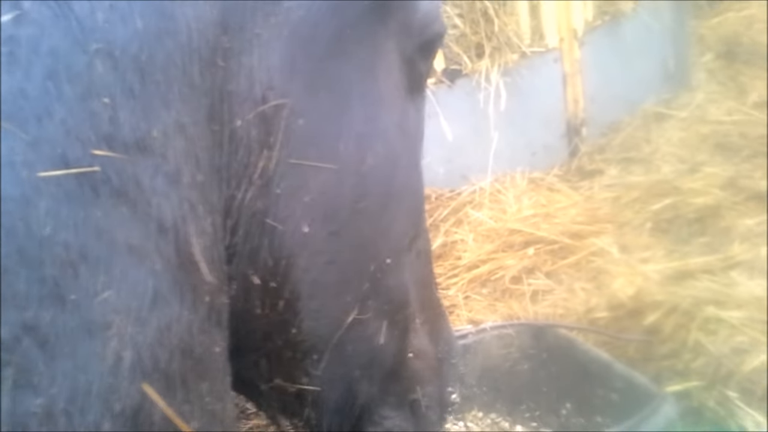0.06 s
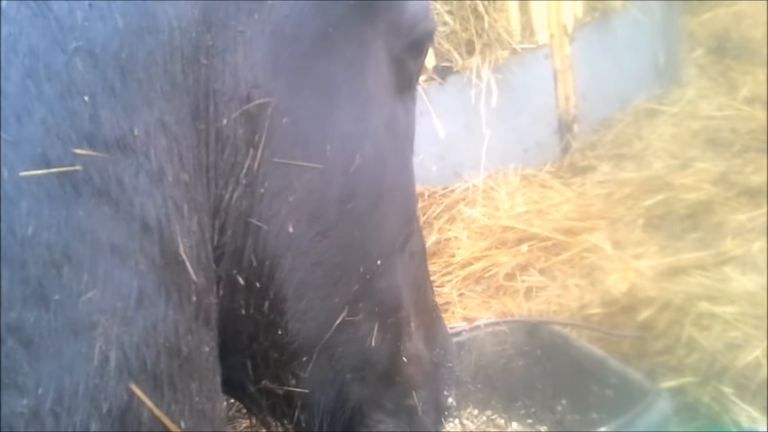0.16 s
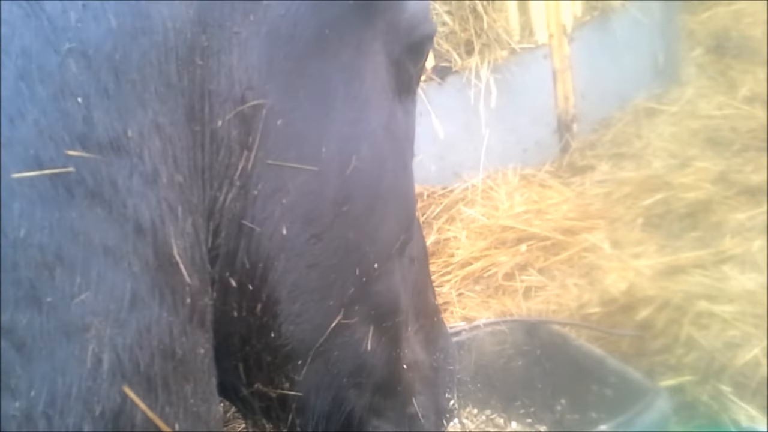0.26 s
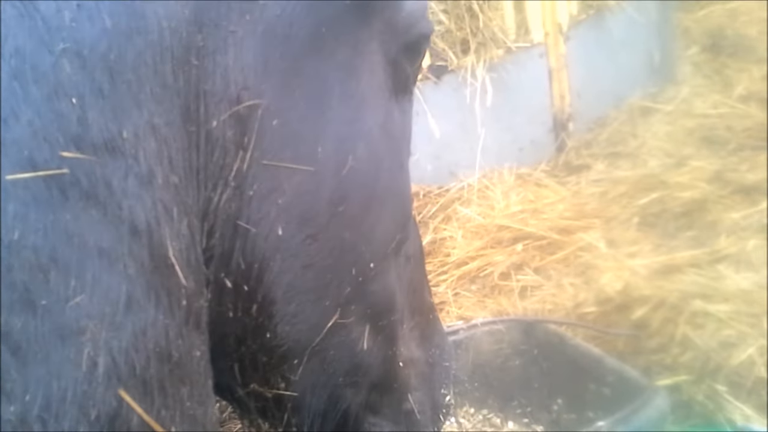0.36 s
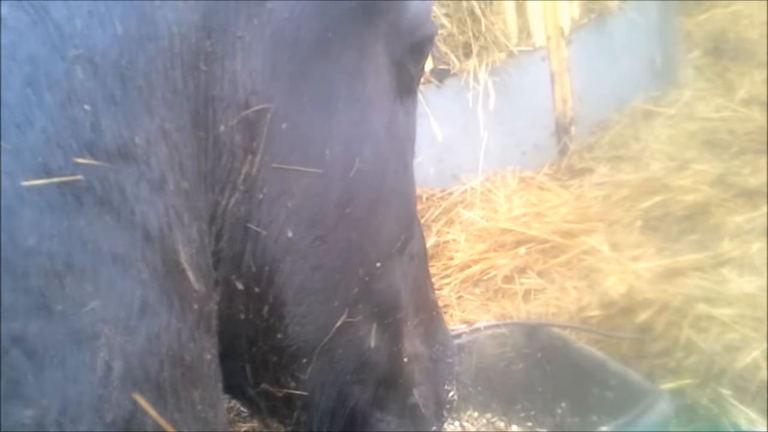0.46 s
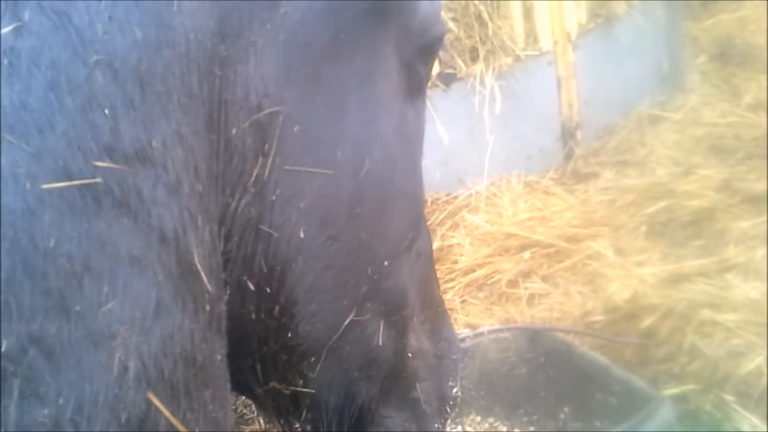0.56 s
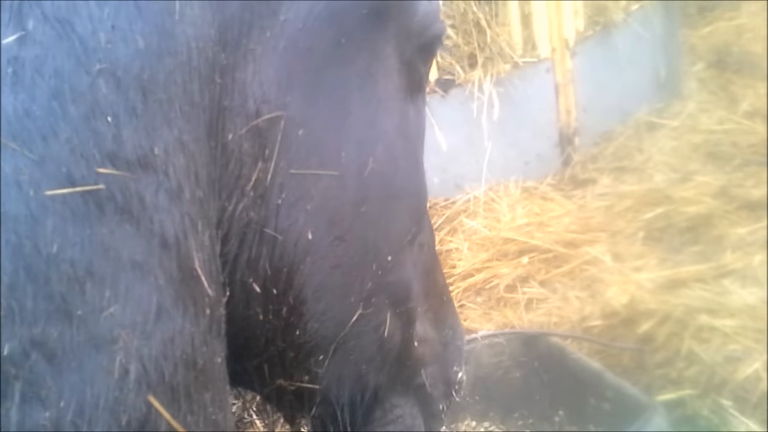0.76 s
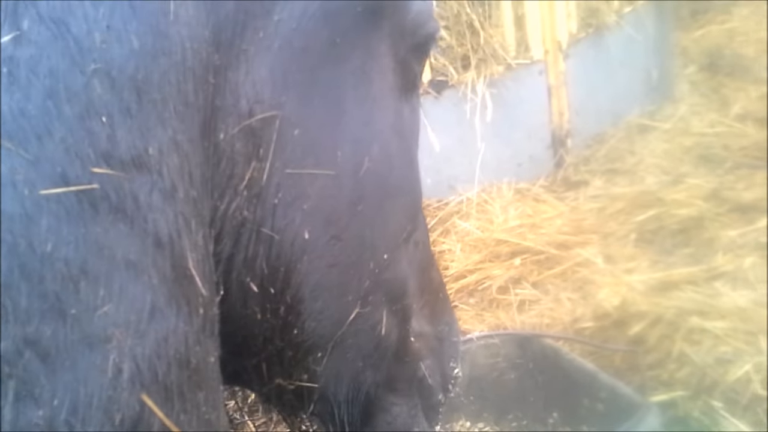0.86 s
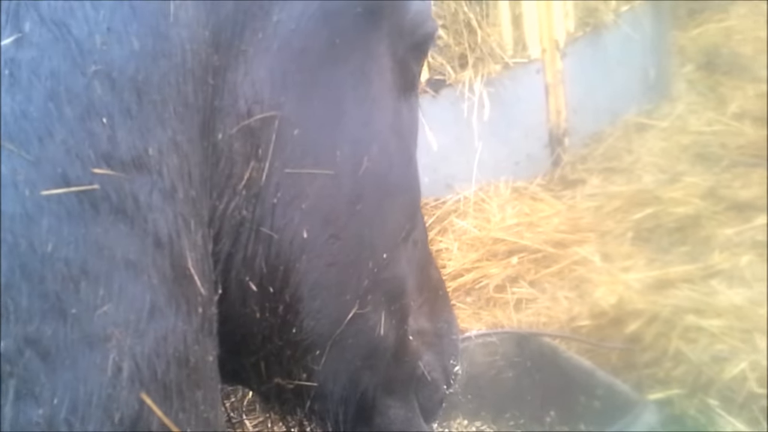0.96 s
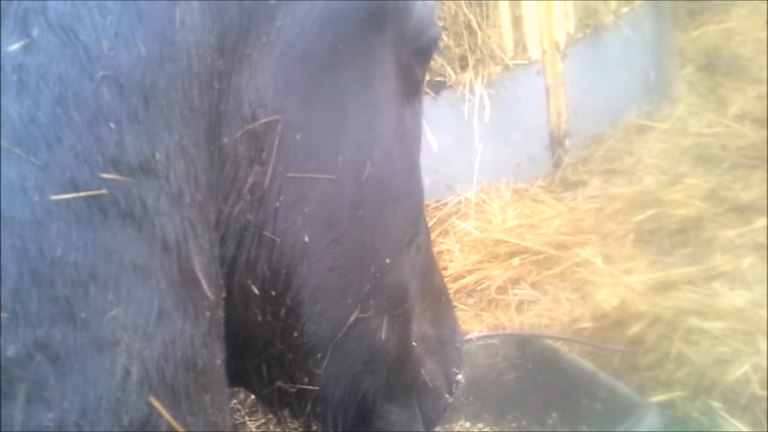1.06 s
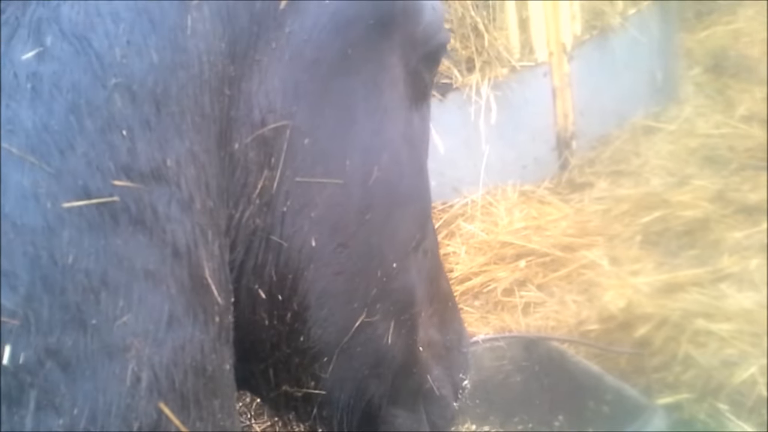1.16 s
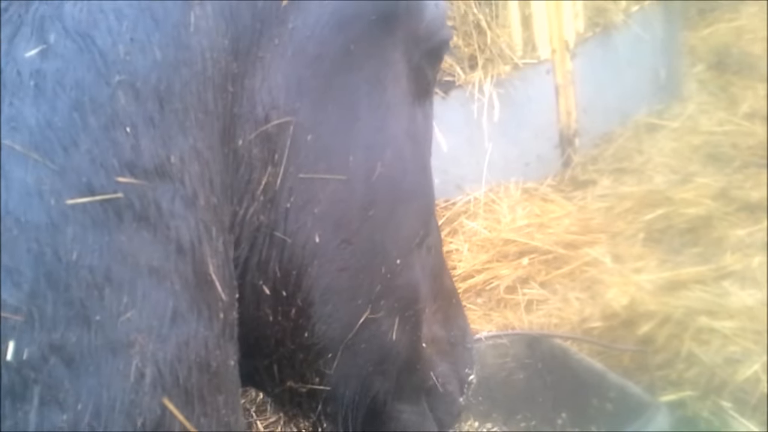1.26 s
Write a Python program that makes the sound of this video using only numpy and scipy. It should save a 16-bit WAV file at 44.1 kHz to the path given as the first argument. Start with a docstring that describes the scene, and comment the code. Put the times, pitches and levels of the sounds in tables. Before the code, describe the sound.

A pony crunches and rustles through dry grain in a plastic feed tub, with sharp irregular cracks

```python
"""Quiet stable air and a rustle of dry grain run beneath cracks and dull knocks; a faint whistle comes late.
A pony pushes its muzzle through the grain in a plastic feed tub, close to the microphone.
The air is filtered noise; the rustle is a random sum of tiny damped rings that swells and sinks.
Cracks strike the modes of the tub wall and add a hiss; knocks drive one low resonance with noise.
The whistle is a sine tone of wavering frequency and amplitude."""
import sys
import numpy as np
from scipy import signal
from scipy.fft import rfft, irfft
from scipy.io import wavfile
from scipy.ndimage import uniform_filter1d

SR = 44100
rng = np.random.default_rng(int(sys.argv[2]) if len(sys.argv) > 2 else 0)


def field_ratio(decibels):
    """Amplitude ratio for a level in dB (20 dB per decade); scalars and array-likes work."""
    return 10 ** (np.asarray(decibels, dtype=float) / 20)


def to_wav(s):
    """Save 16-bit WAV."""
    ch = np.atleast_2d(s).T  # columns
    pcm = np.round(np.clip(ch, -1, 1) * 32767)  # PCM
    wavfile.write(sys.argv[1], SR, pcm.astype(np.int16))


N = 57330  # samples, 1.3 s

# Spectrum of the stable air: f/Hz, relative density/dB per Hz
AIR_SPECTRUM = [(15, -77), (25, -43), (91, -14), (148, -8.5), (183, -6.5), (423, -9), (471, -10.5),
                (724, -12.5), (1500, -17.5), (3450, -22.5), (5310, -30.5),
                (15600, -22)][:-1] + [(17000, -22)]
# Rustle of grain stirred by the muzzle: t/s, coarse level/dB, medium level/dB, fine level/dB
STIR_LEVELS = [(0, -52.5, -55, -62), (.04, -56, -53, -64), (.065, -64, -58, -72), (.135, -62, -63, -59),
               (.16, -50, -46, -59), (.195, -42, -42.5, -47), (.24, -38, -37, -48), (.275, -49, -39, -45),
               (.31, -43, -39, -46), (.35, -50.5, -48.5, -52), (.385, -44, -42, -49.5),
               (.415, -29, -30.5, -39), (.45, -39.5, -35, -43), (.49, -40.5, -38.5, -46),
               (.535, -42, -42, -49.5), (.58, -38, -31, -34), (.6, -30.5, -33.5, -39),
               (.63, -35.5, -34.5, -40.5), (.675, -42.5, -37.5, -42), (.71, -42.5, -33.5, -33.5),
               (.745, -36, -35.5, -40.5), (.765, -47.5, -43.5, -48.5), (.81, -44.5, -49, -57),
               (.855, -46.5, -46.5, -50.5), (.885, -48.5, -52, -65), (.93, -52.5, -52, -59),
               (1.0, -56.5, -55.5, -65), (1.045, -52, -50, -57), (1.075, -50.5, -52, -60),
               (1.1, -61, -57, -72), (1.2, -58, -58, -63), (1.3, -86, -63, -79)]
# Spectra of the coarse, medium and fine kernels: f/Hz, relative density/dB per Hz
COARSE_SPECTRUM = [(600, -11), (1000, -15), (1450, -3.5), (1800, -2.5), (2100, -5), (2700, -2.5), (3500, 2),
                   (4300, -9)]
MEDIUM_SPECTRUM = [(3800, -2), (4500, -6), (5600, 1), (6400, -0.5), (7400, -4.5), (7700, -3.5), (8200, 0),
                   (9200, -13)]
FINE_SPECTRUM = [(8800, 3), (10500, 13), (11500, 4), (13000, -1), (14500, 3), (16500, 2)]
# Cracks: t/s, peak level of the ringing/dB, centre f/Hz, length/s, breadth/octaves,
# peak level of the hiss relative to the ringing/dB
CRACK_EVENTS = [(0.025, -30.5, 3520, 0.002, 1.2, -0.5), (0.093, -41, 3400, 0.0032, 0.78, -9),
                (.153, -37, 2800, 0.0011, 0.37, -6), (.170, -37, 3900, .0015, 0.36, -8),
                (0.2023, -21.5, 3730, 0.00064, 0.52, -10), (0.2056, -20, 2400, .001, 1.3, -8),
                (0.2204, -18, 3480, .0012, 1.1, -4), (0.2277, -27, 3500, 0.0012, 0.89, -4),
                (0.2329, -22, 2980, .0015, 1.4, -4), (0.2382, -24, 3540, .002, 0.92, -3),
                (0.2497, -22.5, 3750, 0.0023, 0.86, 0), (0.266, -21, 3460, 0.0011, 0.99, -1),
                (0.2988, -22.5, 7000, 0.00069, .6, -3), (0.3013, -28.5, 3250, 0.0011, 0.62, -18),
                (0.322, -30, 4700, 0.001, 0.73, 4), (0.355, -34, 2810, 0.00073, 0.37, -6),
                (.374, -25.5, 3800, .002, 0.79, -6), (0.3994, -21.5, 1900, 0.0026, 0.56, -11),
                (0.403, -25, 2090, 0.0024, .5, -5), (0.411, -12.5, 1660, 0.00056, 0.58, -21),
                (0.415, -22.5, 1630, 0.00087, 0.27, -21), (.4246, -27, 4000, 0.0017, .8, -3),
                (.488, -23.5, 2150, .001, 1.4, -10), (0.543, -27, 5450, 0.0016, 0.52, -5),
                (0.5828, -19, 2130, 0.0023, 0.38, -10), (0.5883, -14, 2660, .0008, 0.28, -16),
                (0.6038, 1.5, 2800, .001, 1.06, -11), (0.6137, -22.5, 3180, .002, 1.8, -15),
                (0.6157, -16, 3200, 0.00072, 0.67, -14), (0.625, -12.5, 2190, 0.00082, 0.38, -5),
                (0.628, -16.5, 3270, 0.0014, 0.66, -26), (.633, -31, 3000, 0.0016, 0.44, -14),
                (0.7378, -23.5, 2260, .002, 0.54, -5), (0.7971, -19, 2920, 0.00082, 0.74, -14),
                (0.853, -32.5, 6000, 0.0024, 0.52, -2), (.918, -37, 2750, 0.0012, 0.3, -16),
                (0.985, -39, 2800, .001, 0.19, -20), (1.0316, -18, 2780, 0.00076, .65, -13),
                (1.036, -35.5, 2960, 0.0026, 0.32, -14), (1.0687, -29.5, 5430, 0.00082, .7, -6)]
# Modes of the tub wall: f/Hz, relative level/dB, decay time t60/s
TUB_MODES = [(1130, -6.5, 0.0095), (1420, -0.5, 0.015), (1675, 2.5, 0.011), (2400, 4.5, 0.0068),
             (2800, 6, 0.0072), (3400, 2, 0.0061), (3940, 10, 0.0062), (4700, 3.5, 0.0095),
             (5610, 3.5, 0.01), (6530, -7.5, 0.0066), (7300, 12.5, 0.0049), (8000, -6, 0.0054),
             (9900, -19, 0.004), (11000, -16, .005)]
# Dull knocks on the tub: t/s, peak level/dB, f/Hz, decay time t60/s
KNOCK_EVENTS = [(.204, -41, 794, .012), (.397, -38, 320, 0.013), (.411, -34.5, 790, 0.0078),
                (.582, -27, 457, 0.0092), (.604, -32.5, 790, 0.0088), (.623, -36, 453, 0.016),
                (.739, -38, 810, .012)]
# Faint thin whistle: t/s, level before wavering/dB
WHISTLE_LEVELS = [(.78, -75), (.82, -51), (.96, -55), (.985, -79), (1.085, -85), (1.105, -60.5), (1.2, -66),
                  (1.3, -66)]


def evened(x):
    """Normalisation: scales a signal to unit rms."""
    return x / np.sqrt(np.mean(x ** 2) + 1e-20)


def read(points, hz):
    """Interpolation: reads a spectrum table on a logarithmic frequency axis."""
    f, value = np.transpose(points)
    return np.interp(np.log(hz + 1), np.log(f + 1), value)


def level(table, column):
    """Amplitude envelope: turns one dB column of a table into a gain over time."""
    rows = np.array(table)
    return field_ratio(np.interp(np.arange(N) / SR, rows[:, 0], rows[:, column]))


def add(mix, s, sound):
    """Superposition: sums a sound into the mix from s seconds on."""
    part = mix[round(s * SR):][:len(sound)]
    part += sound[:len(part)]


def air():
    """Filtered noise: white noise is weighted by the spectrum of the stable air."""
    level_db = -50.5  # rms
    spectrum = rfft(rng.standard_normal(N))
    gain = field_ratio(read(AIR_SPECTRUM, np.fft.rfftfreq(N, 1 / SR)))
    return field_ratio(level_db) * evened(irfft(spectrum * gain, N))


def kernels(points, per_s, q, count=16):
    """Shot noise: many random impacts, each a short damped ring; a few are somewhat larger."""
    size_db = 0.5  # per unit of the exponentially distributed kernel size
    pitches = np.geomspace(points[0][0], points[-1][0], count)
    t, out = np.arange(600) / SR, np.zeros(N)
    draw, size = rng.random((count, N)), rng.exponential(1, (count, N))
    for hz, d, s in zip(pitches, draw, size):
        decay = np.exp(-np.pi * hz * t / q)
        onset = 1 - np.exp(-t * hz)
        ring = np.sin(2 * np.pi * hz * t) * decay * onset
        hits = (d < per_s / count / SR) * field_ratio(size_db * np.minimum(s, 4))
        ticks = signal.oaconvolve(hits, ring / np.linalg.norm(ring))[:N]
        # sqrt(hz) offsets the wider band over which a higher ring spreads its energy
        out += ticks * field_ratio(read(points, hz)) * np.sqrt(hz)
    return evened(out)


def rustle():
    """Granular friction: coarse, medium and fine kernels slide over each other, each with its envelope."""
    coarse = level(STIR_LEVELS, 1) * kernels(COARSE_SPECTRUM, per_s=4500, q=5.24)
    medium = level(STIR_LEVELS, 2) * kernels(MEDIUM_SPECTRUM, per_s=11000, q=6.0)
    fine = level(STIR_LEVELS, 3) * kernels(FINE_SPECTRUM, per_s=10000, q=11)
    return coarse + medium + fine


def struck_modes(hz, length, breadth, tail_noise, detunings, strikes):
    """Modal excitation: the tub modes near hz are each struck twice, then stirred by a faint noise tail."""
    detune, rebound = 0.068, 0.49  # greatest relative shift; amplitude of the second strike
    tail_db, tail_t60 = -46, 0.05  # s
    t = np.arange(2048) / SR
    sound = np.zeros(len(t))
    tail = field_ratio(tail_db - 60 * t / tail_t60) * tail_noise
    for (f, db, t60), d, (first, second) in zip(TUB_MODES, detunings, strikes):
        octaves = np.log2(f / hz)
        envelope = field_ratio(db - 5.1 * (octaves / breadth) ** 2 - 60 * t / t60) * (1 - np.exp(-t * f))
        ring = envelope * np.sin(2 * np.pi * f * (1 + detune * np.tanh(d)) * t)
        add(sound, first * length, ring)
        add(sound, (1 + second) * length, rebound * ring)
        sound += signal.fftconvolve(tail, ring)[:len(t)]
    high_pass = signal.butter(4, 900, "high", fs=SR, output="sos")
    return signal.sosfilt(high_pass, sound)


def husk_hiss(length, noise):
    """Noise burst: the husk spits a band of hiss whose envelope peaks after one length."""
    u = np.arange(2048) / SR / length
    band = signal.butter(1, [4700, 11300], "band", fs=SR, output="sos")
    return signal.sosfilt(band, u * np.exp(-u ** 2 / 2) * noise)


def crack(peak_db, hz, length, breadth, hiss_db, noises, strikes):
    """Impact: the ringing of the struck tub modes is superposed on the hiss of the husk."""
    ringing = struck_modes(hz, length, breadth, noises[1], noises[2], strikes)
    hiss = husk_hiss(length, noises[0])
    ringing = ringing / abs(signal.hilbert(ringing)).max()
    hiss = field_ratio(hiss_db) * hiss / abs(hiss).max()
    return field_ratio(peak_db) * (ringing + hiss)


def knock(peak_db, hz, t60, noise):
    """Forced resonance: a low push on the tub wall drives one damped mode with a noise pulse."""
    t = np.arange(2048) / SR
    ring = field_ratio(-60 * t / t60) * np.sin(2 * np.pi * hz * t)
    push = noise * t * np.exp(-t / 0.0015)
    sound = signal.fftconvolve(push, ring)[:len(t)]
    band = signal.butter(3, [200, 1200], "band", fs=SR, output="sos")
    sound = signal.sosfilt(band, sound)
    return field_ratio(peak_db) * sound / abs(sound).max()


def whistle():
    """Frequency and amplitude modulation: slow noise makes the pitch and strength of a sine waver."""
    centre_hz, waver_hz, waver_db = 3525, 16.5, 4  # wavers are rms
    slow = evened(uniform_filter1d(rng.standard_normal((2, N)), 600, axis=1))
    turns = np.cumsum(centre_hz + waver_hz * slow[0]) / SR
    tone = np.sqrt(2) * np.sin(2 * np.pi * turns)  # unit rms
    return level(WHISTLE_LEVELS, 1) * field_ratio(waver_db * slow[1]) * tone


def scene():
    """Superposition: air, rustle and whistle run on while knocks and cracks are added at their times."""
    mix = air() + rustle() + whistle()
    knock_noises = rng.standard_normal((len(KNOCK_EVENTS), 2048))
    for (s, *row), noise in zip(KNOCK_EVENTS, knock_noises):
        add(mix, s, knock(*row, noise))
    crack_noises = rng.standard_normal((len(CRACK_EVENTS), 3, 2048))
    crack_strikes = rng.random((len(CRACK_EVENTS), len(TUB_MODES), 2))
    for (s, *row), noises, strikes in zip(CRACK_EVENTS, crack_noises, crack_strikes):
        add(mix, s, crack(*row, noises, strikes))
    return mix[None]


def band_limit(x):
    """A steep low-pass at the top of the band."""
    return signal.sosfilt(signal.butter(12, 16820, fs=SR, output="sos"), x)


def record(dry):
    """Band limitation and saturation: a low-pass removes the top treble, then peaks clip at full scale."""
    edge_hz = 15740
    low_pass = signal.firwin(2047, edge_hz, window=("kaiser", 9), fs=SR)
    limited = signal.oaconvolve(dry, low_pass[None], "same")
    return band_limit(np.clip(limited, -1, 1))


dry = scene()
out = record(dry)
to_wav(out)
```